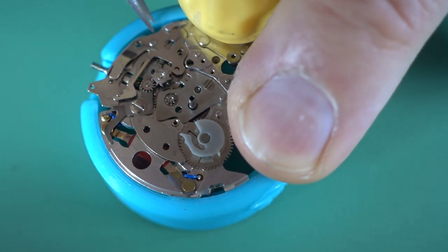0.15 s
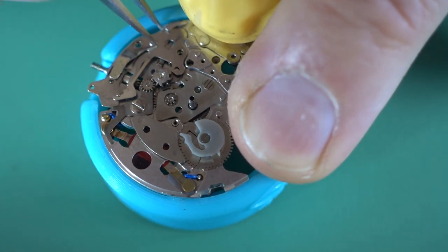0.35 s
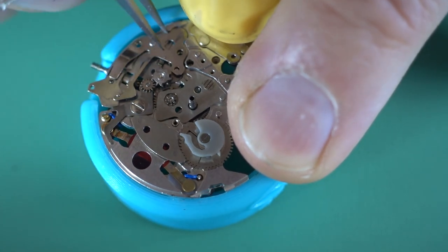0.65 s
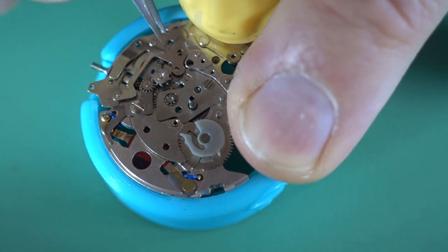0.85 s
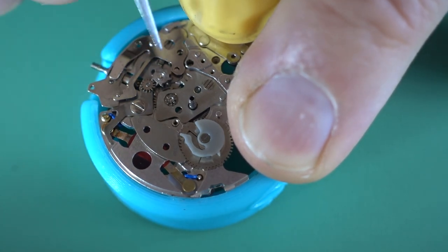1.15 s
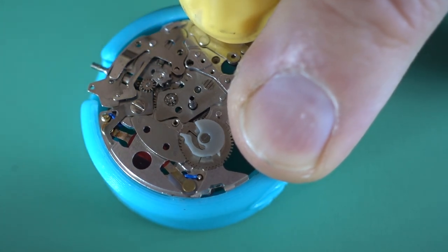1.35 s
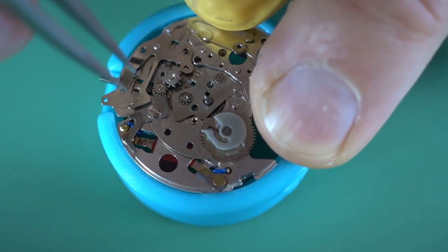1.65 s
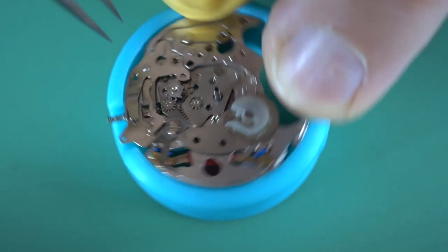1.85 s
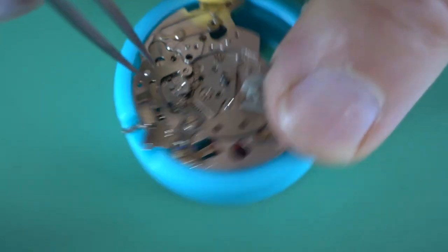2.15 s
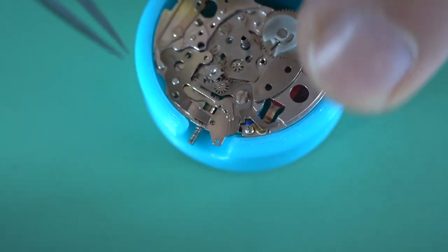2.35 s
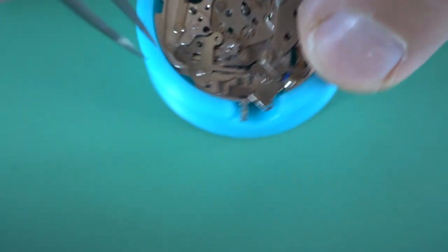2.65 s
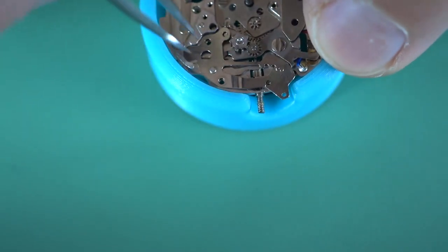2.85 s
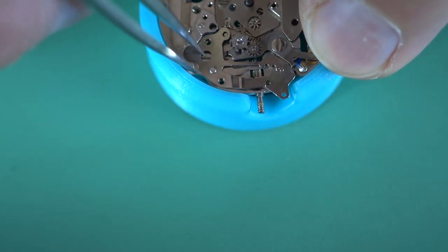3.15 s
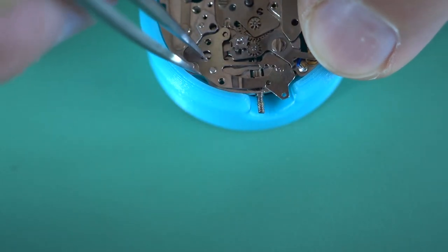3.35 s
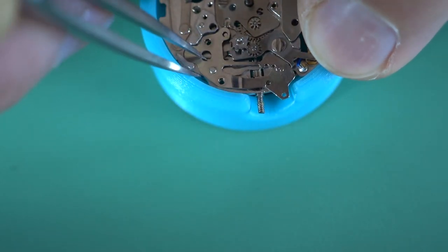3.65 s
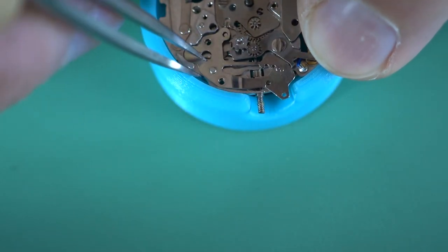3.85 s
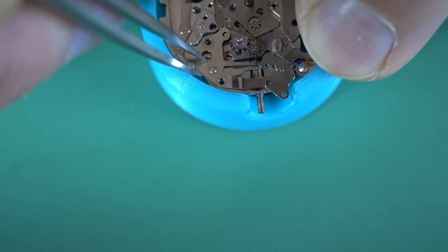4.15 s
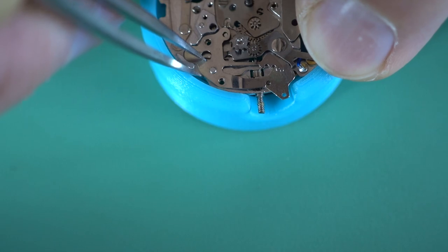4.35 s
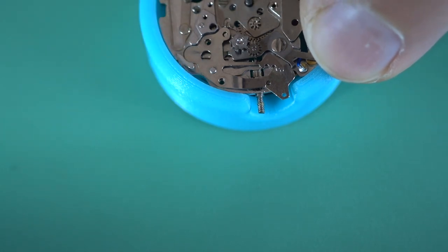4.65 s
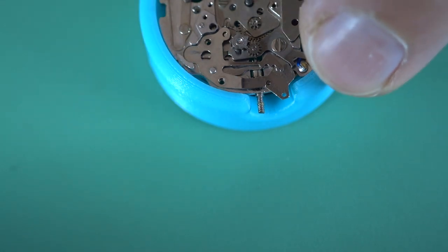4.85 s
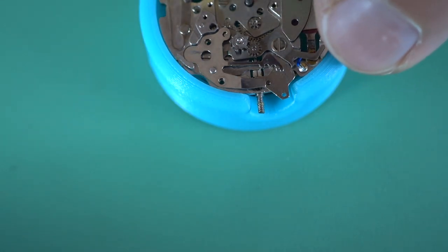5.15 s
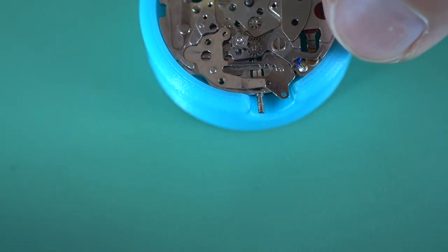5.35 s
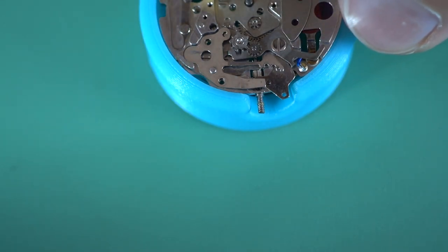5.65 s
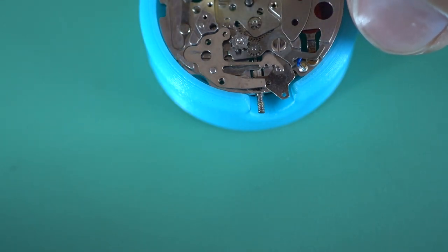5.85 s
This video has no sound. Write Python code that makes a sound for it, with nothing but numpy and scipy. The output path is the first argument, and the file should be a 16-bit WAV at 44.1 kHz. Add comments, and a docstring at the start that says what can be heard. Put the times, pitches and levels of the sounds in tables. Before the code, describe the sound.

Close at a quiet workbench, steel tweezers make irregular small ticks against watch parts, one much sharper and brighter just after a second. The plastic holder rubs and squeaks briefly on the mat. More sparse ticks follow, then two soft dull pops and a quick ringing clatter of tweezers landing on the bench. Faint room air, hum and a low motor purr lie behind, with a short small-room echo.

```python
"""Steel tweezers tick on tiny watch parts: each touch drives resonances of holder, tips and the part hit.
Near the end they are put down: a knock, then a short ringing clatter of blows with one rebound each.
The plastic holder bumps, rubs and squeaks on a bench mat (filtered noise friction), a steady soft noise swells
as fingers shift their grip, two dull pops sound close by. A small quiet room echoes; behind lie air, wavering
hum, hiss and a motor purring in spells."""
import sys
import numpy as np
from scipy import signal
from scipy.fft import rfft, irfft, next_fast_len
from scipy.io import wavfile
from scipy.ndimage import uniform_filter1d

SR = 44100
rng = np.random.default_rng(int(sys.argv[2]) if len(sys.argv) > 2 else 0)


def persist_wave(psi):
    """Save psi, clipped to +-1, as 16-bit WAV."""
    counts = np.round(np.clip(psi, -1, 1) * 32767).astype(np.int16)
    wavfile.write(sys.argv[1], SR, np.atleast_2d(counts).T)


N = 264637
TIME_S = np.arange(N) / SR

# tips on the movement: t/s, holder drive/dB, steel drive/dB, part f/Hz, part drive/dB, chatter decay/s
TICKS = [(0.007, -9.5, -31, 1500, -37, 0.0016), (0.166, -17, -29, 7560, -10.5, 0.0049),
         (0.388, -6.5, -24, 1130, -31, 0.0018), (0.555, -25, -29, 4500, -34, 0.0046),
         (1.2139, -5.5, 4.5, 7010, 8.5, 0.0024), (1.5087, -17.5, -20, 9900, -15.5, 0.0055),
         (1.521, -14, -25, 4760, -17.5, 0.011), (2.193, -3.5, -30, 3460, 3, 0.0039),
         (3.114, -33, -35, 2160, -26, 0.0014), (3.2403, -18, -27, 1700, -20, 0.0018),
         (3.6254, -14, -24, 4140, -19, 0.01), (3.635, -13, -14.5, 7540, -10.5, 0.0021),
         (4.5238, -10, -7.5, 4500, -14, 0.0054)]
# holder and steel tip resonances: f/Hz, width/Hz, level/dB
HOLDER_MODES = [(444, 132, -4), (755, 550, -10), (1250, 430, -1.5), (1650, 185, -4), (2380, 240, -6),
                (3450, 330, -4.5), (4580, 163, -5), (7800, 1260, -15.5)]
STEEL_MODES = [(4500, 360, -8), (7180, 350, -0.5), (8200, 430, -7), (9600, 180, 1), (11300, 590, -12.5),
               (12650, 190, 5), (13600, 1500, -6), (14800, 600, -2)]
# give of the bench top: f/Hz, width/Hz, level/dB
THUMP_MODES = [(38, 21, -19), (189, 220, -24.5)]

# tweezers landing: t/s, bench drive/dB, steel drive/dB, dull knock drive/dB, delay to rebound/s
CLATTER = [(5.328, 2.5, 4.5, 5.5, .0135), (5.3308, -20, -7, 13.5, .012), (5.4082, 6, -9, 8.5, 0.0073),
           (5.425, 6.5, -16, 10, .008), (5.433, 4.5, -11, 11, .010), (5.451, 8, 0.5, 7.5, .009),
           (5.4655, 6.5, 8, -10, .0075), (5.482, 8.5, -1.5, 2, .006), (5.494, 7, 2.5, -10, .012),
           (5.506, 5, -6, -11, .014), (5.535, 1.5, -20, -6, .008)]
# bench, tweezer and dull knock resonances: f/Hz, width/Hz, level/dB
BENCH_MODES = [(330, 140, -15), (492, 57, -6.5), (713, 220, -11), (1010, 310, -3.5), (1290, 420, -4.5),
               (1770, 240, 1), (2500, 330, -1), (3070, 330, 1), (4030, 1200, -4), (4720, 350, -1),
               (5580, 230, -12.5), (7210, 650, -6.5), (7490, 860, -5.5), (10250, 760, -18),
               (13800, 4000, -20)]
TWEEZER_MODES = [(5260, 190, 0.5), (6780, 650, -3), (8100, 820, -7), (9680, 320, 2), (11100, 1300, -6.5),
                 (14100, 640, -9)]
KNOCK_MODES = [(984, 54, -6), (2086, 150, 0.5), (2440, 110, -1.5)]
# long rings of steel bench ware and blades: f/Hz; level/dB
RING_HZ = [1235, 1919, 2207, 2387, 2549, 2660, 3244, 4012, 4216, 4899, 9219, 9296]
RING_DB = [4.5, 7, 4, 0, -1, -5, -7, 8.5, 3.5, 3, 8.5, 10.5]
# highest blade rings: f/Hz; width/Hz, level/dB
BLADE_HZ = [12137, 12400, 12598, 15150]
BLADE_WIDTH_LEVEL = [(40, 3), (80, 5), (32, 5), (44, 11)]
BLOW_CHATTER_S, REBOUND_CHATTER_S, REBOUND_LOSS_DB = 0.0026, 0.0062, 4.5

# holder rocking and settling: t/s, shell level/dB, low body level/dB, chatter decay/s
BUMPS = [(1.2145, -5.5, -10, 0.0036), (3.6254, -2.5, -16, 0.0051), (3.6334, -4.5, -2.5, 0.0018),
         (4.522, -3.5, -15.5, 0.014)]
# hollow shell and low body resonances: f/Hz, width/Hz, level/dB
SHELL_MODES = [(1310, 170, -7), (1740, 170, -0.5), (2140, 220, 3), (2394, 280, -1)]
BODY_MODES = [(430, 160, -3.5), (740, 230, -3), (1110, 250, -1)]

# pushes over the mat: start t/s, hardest push t/s, stop t/s, friction drive/dB, swell to the push/dB,
# squeak drive/dB, mid-push squeak f/Hz
DRAGS = [(1.903, 1.945, 1.98, -42, 15, -54, 3650), (2.205, 2.269, 2.318, -24.5, 19.5, -22, 3670),
         (2.579, 2.747, 2.76, -40.5, 5.5, -46, 3830)]
DRAG_EDGE_DB_PER_S, DRAG_EASE_DB_PER_S = 1300, 95
SQUEAK_SWING, SQUEAK_FADE_DB_PER_S, SQUEAK_CREEP_HZ = 1.32, 200, 320
# resonances under rubbing: f/Hz, width/Hz, level/dB
RUB_MODES = [(420, 200, -29), (810, 164, -4), (1250, 195, 0.5), (1705, 150, -1.5), (2146, 103, -3.5),
             (3260, 840, -15), (4760, 280, -11), (7930, 710, -12.5), (9600, 530, -41), (15300, 800, -23)]
# fingers shifting grip: middle t/s, length/s, noise drive/dB
GRIPS = [(1.93, 0.075, -67), (5.973, 0.22, -65.5)]
SOFT_NOISE_DB = -70.5  # constant drive under the grip swells
# resonances of the soft noise: f/Hz, width/Hz, level/dB
SOFT_NOISE_MODES = [(1370, 570, 8), (2165, 290, 18), (3670, 1420, 6), (8060, 3400, -4), (13500, 3300, -16)]

# dull pops close by: t/s, drive/dB, f/Hz
POPS = [(5.1295, -2.5, 2280), (5.225, -12, 1990)]

# motor body: f/Hz, width/Hz, level/dB
MOTOR_MODES = [(708.6, 58, -45.5), (940, 320, -61.5)]
# purring spells: start t/s, stop t/s
PURR_SPELLS = [(0, 1.35), (1.8, 4.45)]
PURR_HZ, PURR_UNEVEN_DB = 30, 1.2  # turns per second; spread of tick strength
PURR_DB, PURR_IDLE_DB, PURR_FADE_S = 0.5, -10.5, 0.079  # drive in and between spells; fade
# wavering hum: f/Hz; rms level/dB
HUM_HZ = [238, 357, 516, 594, 1040]
HUM_DB = [-90.5, -77.5, -80.5, -81, -82]
# hiss band: f/Hz, width/Hz, level/dB
HISS_MODES = [(2256, 110, -53)]
# room air spectrum: f/Hz, relative density/dB
AIR_SPECTRUM = [(25, -59), (50, -36), (90, -22.5), (180, -22.5), (260, -7.5), (400, -5), (560, -5),
                (900, 0), (1400, -7.5), (2300, -11), (3200, -11), (6000, -13), (10000, -15), (15500, -17.5)]
AIR_RMS_DB = -63.5

# echo drive of each source: name -> level/dB
ROOM_DB = {"holder": -1, "bumps": -0.5, "tips": -7, "parts": -10.5, "slide": -1.5, "clatter": 0.5}
# echo: f/Hz, level/dB; f/Hz, t60/s
ECHO_SPECTRUM = [(100, -22), (400, -2.5), (1200, 0.5), (2300, -1), (4500, -0.5), (8000, -7), (15000, -8.5)]
ECHO_T60 = [(150, 0.5), (500, 0.44), (2000, 0.44), (5000, 0.41), (9000, 0.37), (15000, 0.32)]
# diffuse sound: f/Hz, left-right correlation [1]
LIKENESS = [(60, .98), (290, 0.92), (640, 0.72), (1410, 0.44), (3100, 0.0026), (7000, 0)]
# near sound: f/Hz, power share differing between the microphones [1]
WIDTH = [(200, 0.006), (700, 0.013), (1400, 0.037), (2800, 0.22), (5500, 0.48), (10000, 0.57), (14000, 0.7)]
# lean of the bench sounds: f/Hz, left minus right/dB
LEAN = [(400, -0.5), (1300, -1.5), (2400, -1.5), (4400, 0.5), (8000, 0.5), (15000, 1.5)]
CUTOFF_HZ = 15900


def from_db(db):
    """Decibels to amplitude gain."""
    return 10 ** (np.asarray(db) / 20)


def rms_one(x):
    """Scale to unit rms."""
    return x / np.sqrt(np.mean(x ** 2) + 1e-20)


def at_hz(points, hz):
    """Interpolate a table over log frequency."""
    known, values = np.transpose(points)
    return np.interp(np.log(hz + 1e-9), np.log(known), values)


def colour(x, gain_at):
    """Weight a signal by a function of frequency."""
    size = next_fast_len(x.shape[-1], True)
    spectrum = rfft(x, size) * gain_at(np.fft.rfftfreq(size, 1 / SR))
    return irfft(spectrum, size)[..., :x.shape[-1]]


def resonate(drive, modes):
    """Parallel two-pole resonances of alternating sign; level is the peak gain."""
    out = 0
    for k, (hz, width_hz, db) in enumerate(modes):
        r = np.exp(-np.pi * width_hz / SR)
        top = (-1) ** k * from_db(db) * (1 - r * r) / 2
        poles = [1, -2 * r * np.cos(2 * np.pi * hz / SR), r * r]
        out = out + signal.lfilter([top, 0, -top], poles, drive + 1e-18)
    return out


def gliding(force, turn, width_hz):
    """Resonance centred on a turning phase: shift down, low-pass, shift back."""
    lowpass = signal.butter(2, width_hz / 2, fs=SR, output="sos")
    return 2 * np.real(turn * signal.sosfilt(lowpass, force / turn))


def contact(chatter_s, snap, size=4096):
    """Mid and side force of one touch: snap (mid only) plus decaying micro-bounces; unit energy each."""
    force = rng.standard_normal((2, size)) * np.exp(-np.arange(size) / SR / chatter_s)
    force /= np.linalg.norm(force, axis=1, keepdims=True)
    force[0, 0] += snap
    return force / np.linalg.norm(force, axis=1, keepdims=True)


def friction(level, rough_db, grain_s):
    """Mid and side force of rubbing: dense slips of uneven strength under an envelope."""
    slips = rms_one(uniform_filter1d(rng.standard_normal(N), max(int(grain_s * SR), 1)))
    return level * rms_one(rng.standard_normal((2, N)) * from_db(rough_db * slips))


def add(track, s, sound):
    """Mix a sound into a track at a time."""
    start = max(round(s * SR), 0)
    track[:, start:start + sound.shape[1]] += sound[:, :N - start]


def to_stereo(mid_side):
    """Long waves reach both microphones alike, short ones do not."""
    mid = colour(mid_side[0], lambda hz: np.sqrt(1 - at_hz(WIDTH, hz)))
    side = colour(mid_side[1], lambda hz: np.sqrt(at_hz(WIDTH, hz)))
    return np.array([mid + side, mid - side])


def diffuse(size):
    """Stereo noise arriving from all around."""
    mid, side = rng.standard_normal((2, size))
    mid = colour(mid, lambda hz: np.sqrt((1 + at_hz(LIKENESS, hz)) / 2))
    side = colour(side, lambda hz: np.sqrt((1 - at_hz(LIKENESS, hz)) / 2))
    return np.array([mid + side, mid - side])


def ticks(part_width_hz=380, thump_db=2):
    """Each touch shakes the holder, the steel tips and the one small part that is hit."""
    holder, tips, parts = np.zeros((3, 2, N))
    for s, holder_db, steel_db, part_hz, part_db, chatter_s in TICKS:
        force = contact(chatter_s, snap=0.54)
        add(holder, s, from_db(holder_db) * force)
        add(tips, s, from_db(steel_db) * force)
        add(parts, s, resonate(force, [(part_hz, part_width_hz, part_db)]))
    thump = from_db(thump_db) * resonate(holder, THUMP_MODES)
    return resonate(holder, HOLDER_MODES) + thump, resonate(tips, STEEL_MODES), parts


def clatter(ring_width_hz=14, blade_lean_db=0.5, blade_spread=0.37):
    """Tweezers bounce on the bench, each blow rebounding weaker and looser; blades ring on across blows."""
    bench, steel, knock = np.zeros((3, 2, N))
    for s, bench_db, steel_db, knock_db, rebound_s in CLATTER:
        blow = s, 0, BLOW_CHATTER_S
        rebound = s + rebound_s, REBOUND_LOSS_DB, REBOUND_CHATTER_S
        for at_s, loss_db, chatter_s in (blow, rebound):
            force = contact(chatter_s, snap=0.38)
            add(bench, at_s, from_db(bench_db - loss_db) * force)
            add(steel, at_s, from_db(steel_db - loss_db) * force)
            add(knock, at_s, from_db(knock_db - loss_db) * contact(chatter_s, snap=0.84))
    rings = [(hz, ring_width_hz, db) for hz, db in zip(RING_HZ, RING_DB)]
    bodies = resonate(bench, BENCH_MODES + THUMP_MODES)
    bodies = bodies + resonate(steel, TWEEZER_MODES + rings) + resonate(knock, KNOCK_MODES)
    blade_modes = [(hz, width_hz, db) for hz, (width_hz, db) in zip(BLADE_HZ, BLADE_WIDTH_LEVEL)]
    blade_drive = steel[0] + blade_spread * np.array([steel[1], -steel[1]])
    blades = resonate(blade_drive, blade_modes)
    return to_stereo(bodies) + blades * from_db([[blade_lean_db], [-blade_lean_db]])


def bumps(edge_hz=2700):
    """Soft, rattling contacts of plastic on the mat: hollow, low-passed."""
    out = np.zeros((2, N))
    for s, shell_db, body_db, chatter_s in BUMPS:
        force = contact(chatter_s, snap=0.3)
        shell = from_db(shell_db) * resonate(force, SHELL_MODES)
        add(out, s, shell + from_db(body_db) * resonate(force, BODY_MODES))
    return signal.sosfilt(signal.butter(6, edge_hz, fs=SR, output="sos"), out)


def push_db(start, hardest, stop, swell_db):
    """Drag level re its peak: swells to the hardest push, eases off; steep edges at start and stop."""
    swell = np.interp(TIME_S, [start, hardest], [swell_db, 0])
    ease = DRAG_EASE_DB_PER_S * np.maximum(TIME_S - hardest, 0)
    outside_s = np.maximum(start - TIME_S, 0) + np.maximum(TIME_S - stop, 0)
    return -np.minimum(swell + ease + DRAG_EDGE_DB_PER_S * outside_s, 150)


def drag():
    """Holder rubbing over the mat: uneven slips excite its resonances."""
    level = 0
    for start, hardest, stop, db, swell_db, _, _ in DRAGS:
        level = level + from_db(db + push_db(start, hardest, stop, swell_db))
    return resonate(friction(level, rough_db=4.0, grain_s=0.00078), RUB_MODES)


def squeak(width_hz=400, octave_db=-15, octave_width_hz=450):
    """Rim squeak: narrow friction resonance creeping up in pitch; its octave lacks the extra fade."""
    level, octave_level, pitch = 0, 0, []
    for start, hardest, stop, _, swell_db, db, hz in DRAGS:
        push = push_db(start, hardest, stop, swell_db)
        fade_db = SQUEAK_FADE_DB_PER_S * np.maximum(TIME_S - hardest, 0)
        level = level + from_db(db + SQUEAK_SWING * push - fade_db)
        octave_level = octave_level + from_db(db + octave_db + push)
        pitch += [(start, hz - SQUEAK_CREEP_HZ / 2), (stop, hz + SQUEAK_CREEP_HZ / 2)]
    pitch_hz = np.interp(TIME_S, *np.transpose(pitch))
    turn = np.exp(2j * np.pi * np.cumsum(pitch_hz) / SR)
    tone = gliding(friction(level, rough_db=2.5, grain_s=0.00096), turn, width_hz)
    octave_force = friction(octave_level, rough_db=2.0, grain_s=0.00084)
    return tone + gliding(octave_force, turn ** 2, octave_width_hz)


def soft_noise():
    """Steady soft noise near 2 kHz, swelling twice as fingers shift their grip."""
    level = from_db(SOFT_NOISE_DB)
    for s, length_s, db in GRIPS:
        level = level + from_db(db) * np.exp(-(2 * (TIME_S - s) / length_s) ** 2)
    return resonate(level * rng.standard_normal((2, N)), SOFT_NOISE_MODES)


def pops(width_hz=1100):
    """Soft, rounded pops of a few cycles: one wide resonance passed three times."""
    out = np.zeros((2, N))
    for s, db, hz in POPS:
        pop = contact(0.014, snap=2.2)
        for _ in range(3):
            pop = resonate(pop, [(hz, width_hz, 0)])
        add(out, s, from_db(db) * pop)
    return out


def room(x, size=27000):
    """Echo tail: diffuse noise in 12 bands, each with its own level and exponential decay."""
    t, noise, tail = np.arange(size) / SR, diffuse(size), 0
    edges_hz = np.geomspace(60, 18000, 13)
    for low, high in zip(edges_hz, edges_hz[1:]):
        centre = np.sqrt(low * high)
        decay = from_db(-60 * t / at_hz(ECHO_T60, centre))
        band = colour(noise, lambda hz: (hz >= low) & (hz < high))
        tail = tail + from_db(at_hz(ECHO_SPECTRUM, centre)) * band * decay / np.linalg.norm(decay)
    return signal.fftconvolve(x, tail, axes=1)[:, :N]


def purr_level():
    """Motor drive: rises from idle for each spell and sinks back."""
    running = sum(1.0 * ((TIME_S >= start) & (TIME_S < stop)) for start, stop in PURR_SPELLS)
    running = uniform_filter1d(running, max(int(PURR_FADE_S * SR), 1))
    return from_db(PURR_IDLE_DB + (PURR_DB - PURR_IDLE_DB) * running)


def motor(tick_share=0.68):
    """One soft tick a turn plus whirring noise, through the motor body; tick_share is of drive power."""
    turns = np.diff(np.floor(PURR_HZ * TIME_S), prepend=0)
    strength = from_db(rng.normal(0, PURR_UNEVEN_DB, N)) * rng.choice([-1, 1], N)
    knocks = rms_one(turns * strength)
    drive = np.sqrt(tick_share) * knocks + np.sqrt(1 - tick_share) * diffuse(N)
    return resonate(purr_level() * drive, MOTOR_MODES)


def hum(width_hz=7):
    """Wavering hum: noise through narrow resonances, alike in both channels."""
    out = 0
    for hz, db in zip(HUM_HZ, HUM_DB):
        out = out + from_db(db) * rms_one(resonate(rng.standard_normal(N), [(hz, width_hz, 0)]))
    return out


def air():
    """Room air: diffuse noise shaped in frequency."""
    return from_db(AIR_RMS_DB) * rms_one(colour(diffuse(N), lambda hz: from_db(at_hz(AIR_SPECTRUM, hz))))


def hiss():
    """Background hiss: diffuse noise through a band resonance."""
    return resonate(diffuse(N), HISS_MODES)


def scene():
    """Bench sounds with their echo, pops without, over the background."""
    holder, tips, parts = ticks()
    sources = {
        "holder": to_stereo(holder), "tips": to_stereo(tips + squeak()), "parts": to_stereo(parts),
        "clatter": clatter(), "bumps": to_stereo(bumps()), "slide": to_stereo(drag() + soft_noise())}
    echo = room(sum(from_db(ROOM_DB[name]) * sound for name, sound in sources.items()))
    heard = sum(sources.values()) + echo + to_stereo(pops())
    leaning = colour(heard, lambda hz: from_db(np.outer([.5, -.5], at_hz(LEAN, hz))))
    return leaning + motor() + hum() + air() + hiss()


def record(dry, low_cut_hz=70):
    """The microphone thins the bass; the top is cut."""
    thin = signal.sosfilt(signal.butter(1, low_cut_hz, "high", fs=SR, output="sos"), dry)
    return signal.sosfilt(signal.ellip(10, .1, 80, CUTOFF_HZ, fs=SR, output="sos"), thin)


dry = scene()
out = record(dry)
persist_wave(out)
```